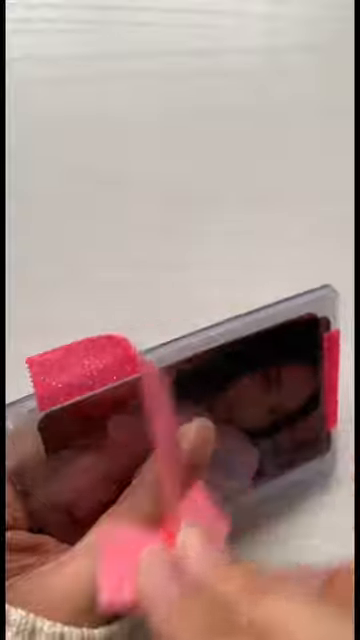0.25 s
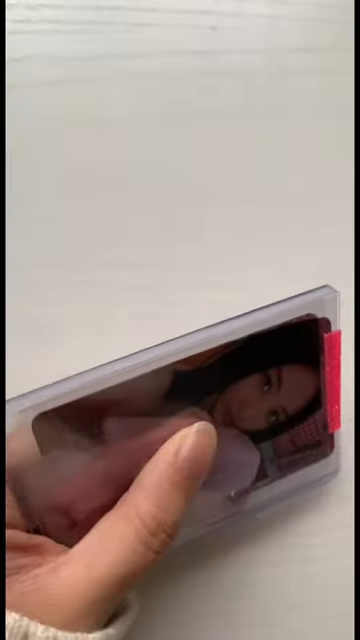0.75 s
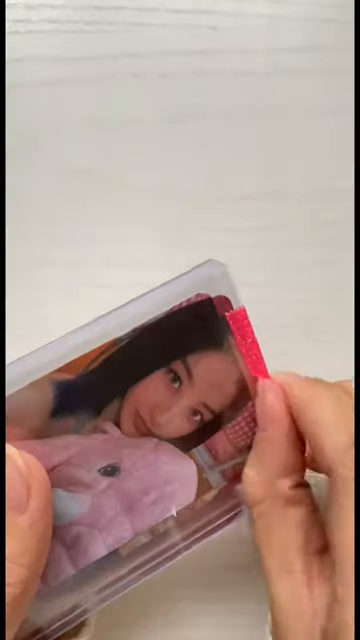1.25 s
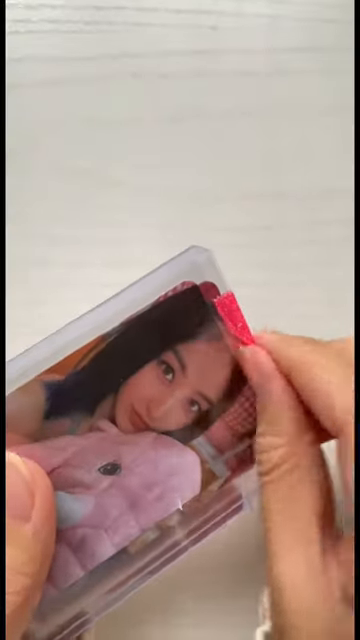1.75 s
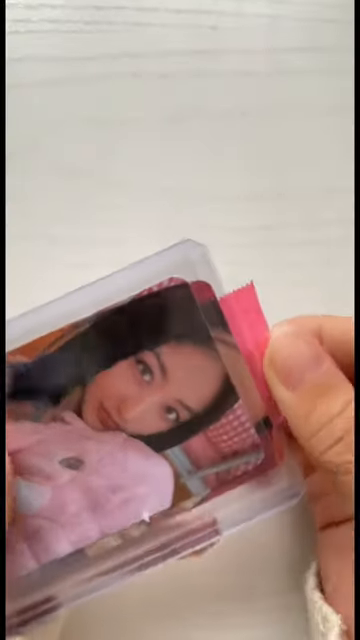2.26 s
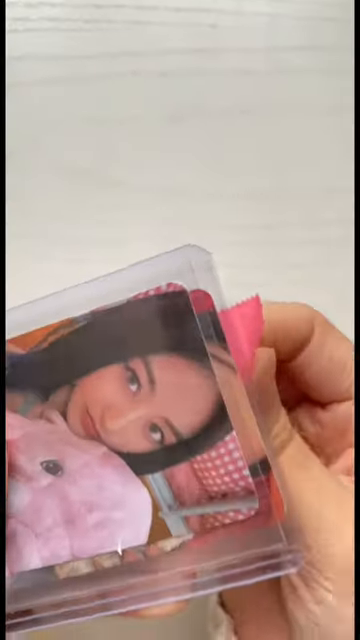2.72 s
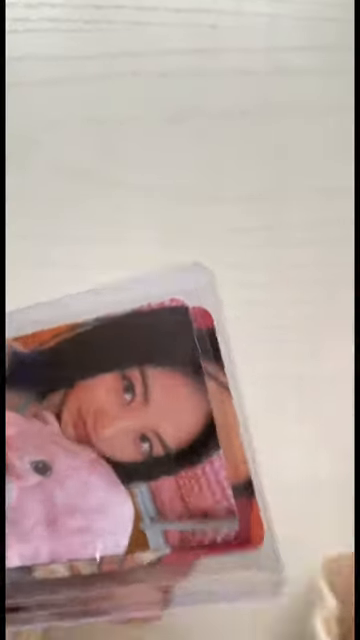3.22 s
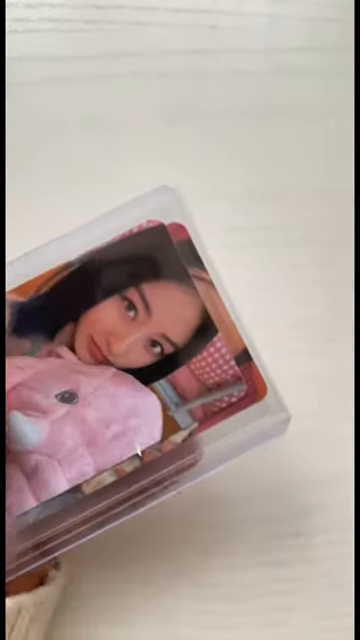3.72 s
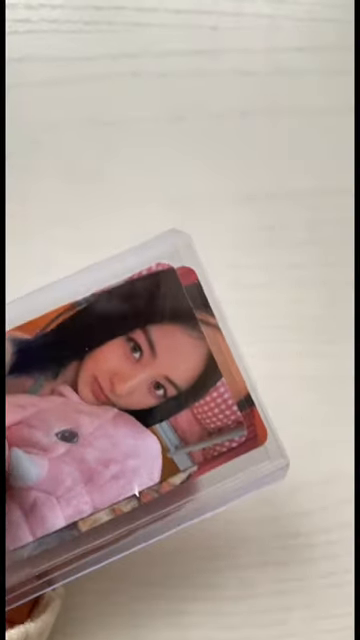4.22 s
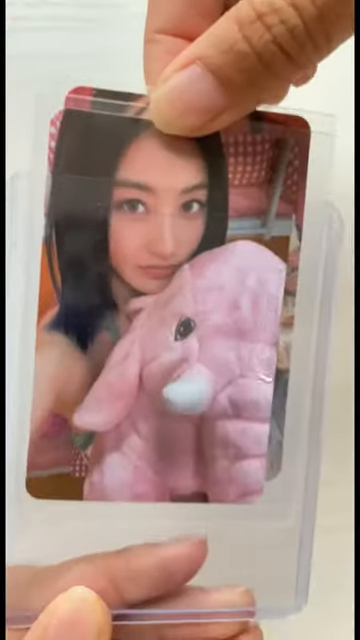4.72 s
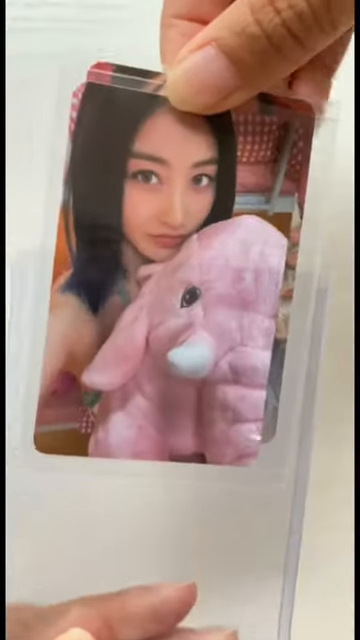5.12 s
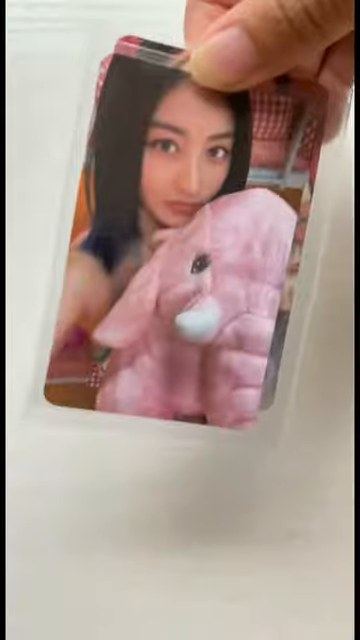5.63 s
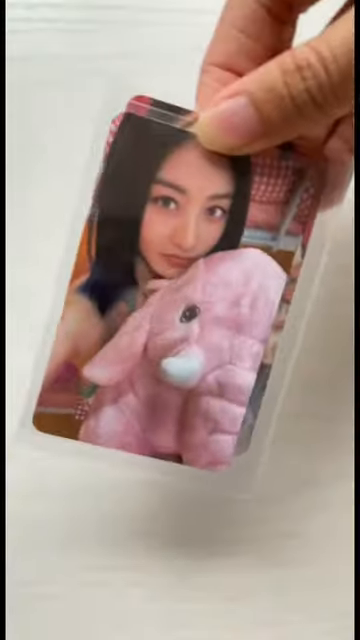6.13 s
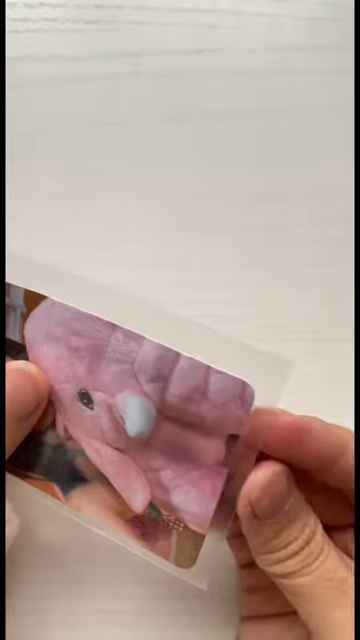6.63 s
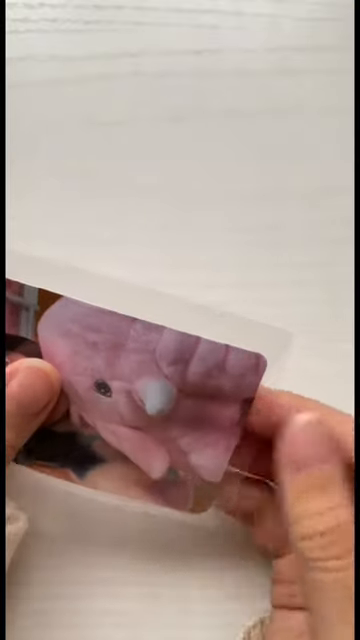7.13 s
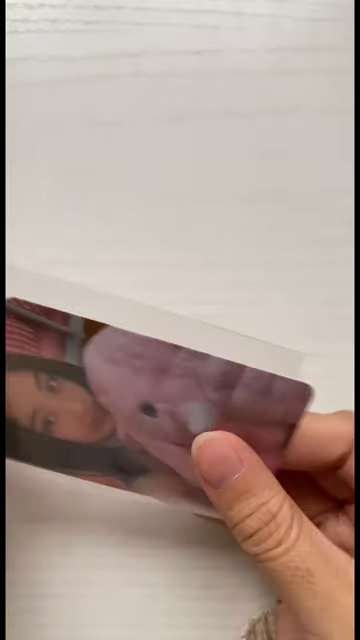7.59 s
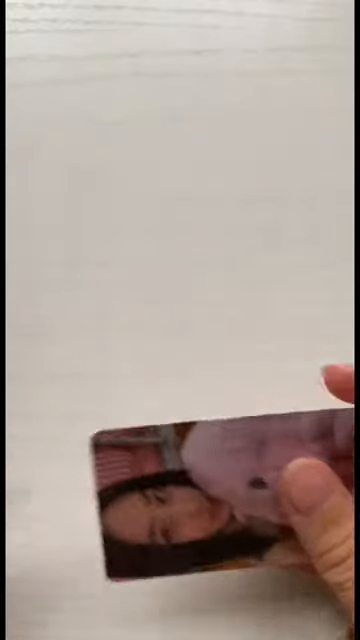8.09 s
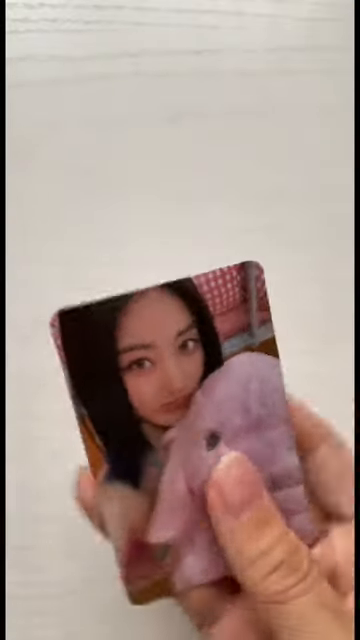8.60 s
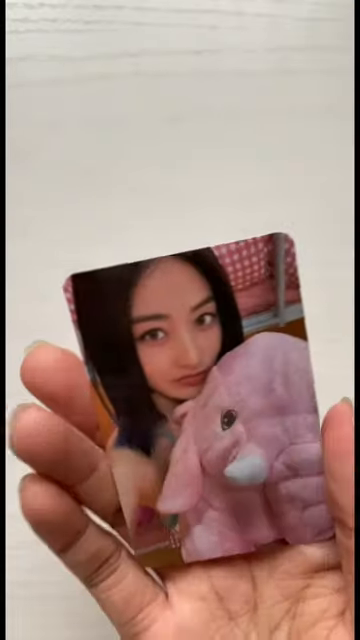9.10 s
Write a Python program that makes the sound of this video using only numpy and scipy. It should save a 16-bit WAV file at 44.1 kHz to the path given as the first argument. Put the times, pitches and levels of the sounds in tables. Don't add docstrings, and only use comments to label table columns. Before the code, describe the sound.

Close to the microphone on a desk in a quiet, humming room, tape rips off a rigid plastic holder in rapid sharp snaps. A fingernail picks at more tape with separate clicks, and a second short peel ends in a low thud. After faint rubbing, a thin sleeve is tugged out with a crinkle and pop; then film crackles and a card hisses out and is turned over with light ticks.

```python
import sys
import numpy as np
from scipy import signal
from scipy.fft import rfft, irfft, next_fast_len
from scipy.io import wavfile
from scipy.ndimage import uniform_filter1d, map_coordinates

SR = 44100
rng = np.random.default_rng(int(sys.argv[2]) if len(sys.argv) > 2 else 0)


def master(y):
    cut = np.clip(np.atleast_2d(y).T, -1, 1)
    pcm = np.round(cut * 32767)
    wavfile.write(sys.argv[1], SR, pcm.astype(np.int16))


def decibels_to_gain(level_db):
    exponent = np.asarray(level_db, float) / 20
    return 10 ** exponent


N = 412335

# time in seconds, level in dB.
HUM = [(0, -49), (.45, -56), (.9, -51), (1.85, -53), (1.95, -61), (2.4, -54), (2.9, -51.5), (3.1, -54.5),
       (3.8, -55.5), (4.2, -51), (4.9, -51.5), (5.2, -47.5), (5.6, -51.5), (5.95, -49), (6.2, -53),
       (8, -52.5), (8.8, -52.5), (9.35, -50.5)]
# frequency in Hz, density in dB per Hz.
ROOMTONE = [(13, -69), (22, -31.5), (46, -6), (96, 1), (149, -2.5), (174, -7), (203, -8), (252, -8.5),
            (441, -25), (610, -29), (900, -36), (1170, -78), (1980, -120)]
# frequency in Hz, width in Hz, level in dB.
DRONES = [(59.2, 22, -62.5), (120.1, 5.3, -62.5), (146.4, 2.35, -56.5), (215.5, 12.8, -69.5),
          (288.4, 20, -70)]
# frequency in Hz, density in dB per Hz.
HISS = [(290, -10.5), (500, -23.5), (605, -3), (641, -20.5), (859, -27), (1020, -14), (1090, -39.5),
        (8300, -26), (16500, -49.5)]
HISS_DB = -75.5
# frequency in Hz, 60 dB decay in seconds.
ROOM = [(300, 0.1), (2000, 0.15), (10000, 0.084)]
# frequency in Hz, lead of the left port in radians.
PORT_PHASE = [(0, 0), (500, .8), (1200, .6), (3300, 2.2), (4600, .6), (6500, -.6), (7700, -1.6),
              (8350, -np.pi), (10800, -2 * np.pi), (13450, -3 * np.pi), (15700, -4 * np.pi),
              (17000, -4.5 * np.pi)]
# frequency in Hz, left minus right in dB.
PORT_BALANCE = [(60, -5), (110, 1.5), (200, -12.5), (380, -10), (700, 15.5), (1290, 3), (2380, 0.5),
                (4400, 4.5), (8120, -5), (15000, 2)]
# frequency in Hz, shared part of the power from 0 to 1.
ALIKE = [(60, 0.82), (150, 0.97), (350, 0.063), (1000, 0.083), (3000, 0.97), (7000, 0.093), (8500, 0.36),
         (10000, 1), (16000, 0.64)]

# start in seconds, peak in dB, pitch in Hz, 60 dB decay in seconds,
# wooden rattle against the peak in dB.
THUDS = [(0.309, -39, 145, 0.17, -13), (1.888, -40, 99, 0.048, -4.5), (2.76, -35, 91, 0.14, -18.5),
         (2.808, -37, 109, 0.14, -19), (2.978, -21.5, 101, 0.094, -31), (3.264, -34.5, 61.4, 0.19, -17),
         (3.277, -37, 62.6, 0.041, -13.5), (3.32, -38, 58.6, 0.11, -18.5), (3.35, -37, 70, 0.17, -16.5),
         (3.401, -37.5, 60.2, 0.27, -24.5), (4.389, -25.5, 56.5, 0.081, -44),
         (5.341, -38.5, 110, 0.23, -17), (6.471, -37.5, 72, 0.072, -11), (6.788, -44, 124, 0.09, -16),
         (7.053, -34.5, 91, 0.089, -31), (8.879, -41.5, 48.7, 0.095, -18)]
# frequency in Hz, width in Hz, level in dB.
DESK = [(205, 66, -2), (296.6, 214, -2), (439, 290, -5.5)]

# frequency in Hz, level in dB.
FILM = [(4000, -22.5), (5500, -3), (7000, 4), (8500, 2), (9500, -2), (11000, -15)]
# frequency in Hz, level in dB.
EDGE = [(8000, -15), (9500, -5.5), (11000, 1.5), (13000, 4), (14500, 3.5), (15800, -4.5), (16600, -9)]
# frequency in Hz, level in dB.
CRINKLE = [(1600, -38.5), (2300, -1.5), (3200, 4.5), (4200, -0.5), (5100, -2.5), (6500, -42.5)]
# frequency in Hz, width in Hz, level in dB.
HOLDER = [(565, 480, -6.5), (1150, 246, -2.5), (1800, 335, -2.5)]

# peak time in seconds,
# peak in dB, seconds to gain 10 dB, seconds to lose 10 dB, pressure on the shell in dB.
LONG_TAPE = [(0, -59, .1, 0.3, 8), (.135, -47.5, 0.24, 0.1, -6), (.344, -48, 0.2, 0.7, 1.5)]
NAIL = [(.846, -59, 0.098, 0.046, -5), (.988, -52.5, 0.018, 0.027, 1), (1.06, -53.5, 0.045, 0.92, -20.5),
        (1.265, -49.5, 0.42, 0.038, -30), (1.399, -42.5, .008, 0.01, -0.5),
        (1.534, -47.5, 0.011, 0.017, -1.5), (1.699, -48.5, .11, 0.75, -27.5),
        (1.875, -50.5, 0.1, 0.058, -17), (2.185, -54, 0.17, 0.28, -12.5),]
SHORT_TAPE = [(2.499, -47.5, 0.11, .5, -9), (2.755, -44, 0.052, 0.11, 0), (2.88, -45.5, 0.013, 0.076, 2),
              (2.978, -51.5, 0.025, 0.035, 10), (3.02, -61, 0.037, .3, -8.5)]
HOLDER_RUBS = [(3.278, -66, 0.017, 0.062, 13), (3.427, -67.5, 0.25, 1.5, -34.5),
               (3.944, -67, 0.21, 0.56, -1), (5.365, -63.5, 0.013, 0.16, -2.5),
               (5.889, -72, .15, 4.1, -4.5)]
PULL_OUT = [(4.153, -59.5, .026, .3, 4), (4.25, -44.5, 0.028, 0.15, 4.2)]
DRAW_OUT = [(4.812, -60, .14, 0.53, -27), (5.096, -53, 0.25, .4, -6), (5.3, -50, 0.15, 0.036, -17),
            (5.342, -32.5, 0.017, .01, -7.5)]
SLEEVE = [(6.45, -44, 0.023, .12, 2.5), (6.62, -66.5, 0.07, 0.25, -7), (6.787, -48, 0.028, 0.032, -3),
          (6.745, -55, 0.014, 0.36, -5.5), (7.049, -43, .1, 0.04, -3.5), (7.2, -45, .35, 0.11, -6),
          (7.363, -53, 0.017, 0.31, -13), (7.58, -44.5, 0.13, .2, -14.5)]
SLIDE_OUT = [(7.7, -48.5, 0.18, 0.11, -2.5), (7.842, -44.5, .05, 0.049, -1.5)]
TURNING = [(7.95, -61.5, .05, 0.6, -1), (8.09, -61, 0.0157, 0.076, 10.5), (8.308, -55, .015, 0.02, 1.5),
           (8.426, -52, 0.014, 0.033, 0), (8.4, -57, .3, .25, -21), (8.575, -49.5, 0.053, 0.044, -13.5),
           (8.65, -52.5, .012, .075, 1.5), (8.86, -61, 0.058, .065, 9.5), (8.995, -54, 0.04, 0.0093, 5.5),
           (9.15, -66.5, .6, .6, 1.5), (9.309, -59.5, 0.033, 0.041, 3)]
# strokes, sharpness of the slips in dB, upper shell mode against lower in dB,
# crinkle in dB.
ACTIONS = [
    (LONG_TAPE, 0.95, 0.2, -4),
    (NAIL, -0.52, 2.9, -1.8),
    (SHORT_TAPE, 1.5, -3, -6),
    (HOLDER_RUBS, -3.7, 1.5, 1.2),
    (PULL_OUT, .3, .4, 4.5),
    (DRAW_OUT, -1.3, 5, 0.0086),
    (SLEEVE, -2, 2.8, -1.8),
    (SLIDE_OUT, 7.4, 7.9, 0.13),
    (TURNING, -1.9, 1.5, 3),
]
CRINKLE_FOLLOWS = 0.41
# time in seconds after which earlier strokes die fast,
# # time in seconds before which later strokes are held back (no gap where it comes first).
PAUSES = [(0.351, .745), (1.34, 1.385), (1.415, 1.3), (1.549, 1.4), (1.901, 1.7), (2.98, 3.3), (3.17, 3),
          (4.389, 4.57), (5.35, 5.355), (6.39, 6.41), (6.525, 5.8), (7.246, 7.34), (9.005, 7)]
LET_GO_S, GRIP_S = 0.011, 0.0075
RESTING_DB, RESTING_PRESS_DB = -84.5, 7.5
TICKS_PER_S, TICK_DB, TICK_T60_S = 130, 3.5, 0.0021

# start in seconds, peak in dB, holder ring against the peak in dB,
# ring pitch in Hz, top edge against the peak in dB.
GLUE_SNAPS = [(0.028, -26.5, -21.5, 1150, -10), (0.095, -22, -12.5, 1720, -10), (0.124, -19, -20, 820, -15),
              (0.144, -15.5, -16.5, 1070, -17), (0.178, -20.5, -8, 1800, -1.5), (0.206, -28, -6, 1530, -2),
              (0.318, -32, -16, 1140, -25), (0.344, -37, -5, 1230, -6), (2.46, -25.5, -23, 1180, -15),
              (2.496, -24, -23, 1150, -16), (2.508, -28, -20.5, 910, -19), (2.524, -21.5, -27, 920, -29),
              (2.563, -27.5, -21.5, 1040, -19), (2.758, -27.5, -10, 960, -23),
              (2.801, -22, -15.5, 1250, -16), (2.974, -17.5, -8, 1107, -20)]
NAIL_SNAPS = [(0.747, -32.5, -26, 2150, -17), (0.858, -44, -8.5, 1528, -24), (0.899, -43, -29, 807, -8),
              (0.986, -28, -19.5, 1197, -22), (1.391, -32, -16, 1150, -29), (1.472, -23, -39, 1800, -25),
              (1.534, -20.5, -22.5, 1190, -21), (1.652, -25.5, -37, 1780, -17),
              (1.761, -13, -41.5, 970, -27), (1.885, -18, -18.5, 1840, -7.5),
              (1.888, -11.5, -17.5, 1700, -9.5), (1.931, -17.5, -20.5, 1800, -23)]
HOLDER_SNAPS = [(3.27, -52, -11, 830, -29), (4.172, -41.5, -3, 2300, -26), (4.243, -31.5, -2, 2420, -16),
                (4.247, -27.5, -11.5, 1070, -9), (4.285, -26.5, -14, 1870, -13),
                (4.575, -47, -19, 1180, -20), (5.337, -25.5, -16, 897, -7), (5.538, -45.5, -21.5, 1770, -7)]
SLEEVE_SNAPS = [(6.412, -36, -5, 1350, -15), (6.636, -27.5, -18.5, 1250, -1), (6.785, -11, -22, 1230, -25),
                (6.938, -43, -14, 1090, -11), (7.049, -18, -15, 1150, -18), (7.202, -13, -28, 1530, -25),
                (8.087, -35.5, -11.5, 1260, -23), (8.173, -37.5, -8, 1230, -8.5),
                (8.427, -42.5, 0, 1330, -7), (8.645, -29, -18, 1530, -21), (9.089, -45, -17, 1350, -11.5),
                (9.3, -37, -21.5, 1250, -18)]
# snaps, crinkle against the peak in dB for a usual ring of the holder.
SNAPPERS = [
    (GLUE_SNAPS, -16),
    (NAIL_SNAPS, -14),
    (HOLDER_SNAPS, -16),
    (SLEEVE_SNAPS, -12.5),
]
CRINKLE_WITH_RING = 0.3


def unit(x):
    return x / np.sqrt(np.mean(x ** 2) + 1e-20)


def noise():
    return rng.standard_normal(N)


def along(points, hz):
    f, v = np.transpose(points)
    return np.interp(np.log(hz + 1), np.log(f + 1), v)


def wobble(rate):
    knots = rng.standard_normal(N // 16)
    return map_coordinates(knots, [np.arange(N) * rate / SR], order=1)


def filtered(x, response):
    m = next_fast_len(x.shape[-1] + 8192)
    spectrum = rfft(x, m) * response(np.fft.rfftfreq(m, 1 / SR))
    return irfft(spectrum, m)[..., :x.shape[-1]]


def colour(points):
    return lambda hz: decibels_to_gain(along(points, hz)) * (hz >= points[0][0]) * (hz <= points[-1][0])


def resonances(modes):
    def response(f):
        return sum((-1) ** k * decibels_to_gain(db) * 1j * f * width / (hz * hz - f * f + 1j * f * width)
                   for k, (hz, width, db) in enumerate(modes))
    return response


def room_tone():
    level_db = np.interp(np.arange(N) / SR, *np.transpose(HUM))
    rumble = unit(filtered(noise(), colour(ROOMTONE))) * decibels_to_gain(2.2 * wobble(5) - 54)
    for hz, width, db in DRONES:
        line = resonances([(hz, width, 0)])
        rumble += decibels_to_gain(db + 1.05 * wobble(2.61)) * unit(filtered(noise(), lambda f: line(f) ** 2))
    return decibels_to_gain(level_db + 2.5) * unit(rumble)


def air():
    return decibels_to_gain(HISS_DB) * unit(filtered(noise(), colour(HISS)))


def room(x):
    hz, t, z = signal.stft(rng.standard_normal((2, SR // 3)), SR, nperseg=256)
    decay = decibels_to_gain(-60 * t / along(ROOM, hz)[:, None])
    tail = signal.istft(z * decay, SR, nperseg=256)[1]
    late = np.pad(x, (150, 0))[None]
    return signal.fftconvolve(late, tail / np.linalg.norm(tail[0]), axes=1)[:, :N]


def ports(x):
    def half(f):
        lead = np.interp(f, *np.transpose(PORT_PHASE))
        return decibels_to_gain(along(PORT_BALANCE, f) / 2) * np.exp(.5j * lead)
    return filtered(x[None], lambda f: np.array([half(f), 1 / half(f)]))


def spread(source):
    share = lambda f: np.clip(along(ALIKE, f), 0, 1)
    shared = filtered(ports(source()), lambda f: np.sqrt(share(f)))
    own = np.array([source(), source()])
    return shared + filtered(own, lambda f: np.sqrt(1 - share(f)))


def thuds():
    out, t = np.zeros(N + SR), np.arange(SR // 3) / SR
    board = resonances(DESK)
    for s, db, hz, t60, rattle_db in THUDS:
        swell = decibels_to_gain(-60 * t / np.clip(t60, .02, .4)) * (1 - np.exp(-t * hz * 4.4)) ** 2
        push = -swell / swell.max() * np.sin(2 * np.pi * hz * t)
        burst = rng.standard_normal(len(t)) * decibels_to_gain(-60 * t / 0.066)
        rattle = filtered(burst, lambda f: board(f) ** 2)
        rattle *= decibels_to_gain(rattle_db + 10) / np.abs(rattle).max()
        out[round(s * SR):][:len(t)] += decibels_to_gain(db) * (push + rattle)
    return out[:N]


def strokes():
    t = np.arange(0, N / SR + .002, .002)
    power = np.zeros((5, len(t)))
    power += decibels_to_gain(2 * (RESTING_DB + RESTING_PRESS_DB * np.c_[[0, 0, 1, 1, 1]]))
    off, on = np.transpose([(-1, -1), *PAUSES, (99, 99)])
    for rows, edge_db, upper_db, crinkle_db in ACTIONS:
        for s, db, rise, fall, press_db in rows:
            level_db = db - 10 * np.maximum((s - t) / abs(rise), (t - s) / abs(fall))
            since_let_go = (t - off[off >= s][0]).clip(0)
            until_grip = (on[on <= s][-1] - t).clip(0)
            level_db -= 10 * (since_let_go / LET_GO_S + until_grip / GRIP_S)
            mix_db = [0, edge_db, press_db - upper_db / 2, press_db + upper_db / 2,
                      crinkle_db + CRINKLE_FOLLOWS * press_db]
            power += decibels_to_gain(2 * (level_db + np.c_[mix_db]))
    return np.array([np.interp(np.arange(N) / SR, t, np.sqrt(p)) for p in power])


def slip_clumps(pull):
    effort = np.clip((20 * np.log10(pull + 1e-9) + 75) / 30, 0, 1)
    bunching = 1.13 * wobble(35) + 0.76 * wobble(250) + 0.59 * wobble(1500)
    slips = decibels_to_gain((1 + 0.98 * effort) * bunching)
    grit = (rng.random(N) < TICKS_PER_S / SR) * decibels_to_gain(TICK_DB * rng.exponential(size=N).clip(0, 3))
    tick = decibels_to_gain(-60 * np.arange(512) / SR / TICK_T60_S)
    slips *= 1 + effort * np.abs(signal.fftconvolve(grit, tick)[:N])
    return slips / np.sqrt(np.abs(uniform_filter1d(slips ** 2, size=3000)))


def patchy(depth_db):
    z = signal.stft(noise(), nperseg=256)[2]

    def smooth(bins, frames):
        over_hz = uniform_filter1d(rng.standard_normal(z.shape), bins, axis=0)
        return unit(uniform_filter1d(over_hz, frames, axis=1))

    field = smooth(6, 14) + .8 * smooth(2, 60)
    return signal.istft(z * decibels_to_gain(depth_db * field), nperseg=256)[1][:N]


def rubbing(slips, gains):
    source = slips * patchy(depth_db=3.5)
    shell = resonances(HOLDER[:-1])
    lower = lambda f: shell(f) * f / (f + 500)
    upper = resonances(HOLDER[-1:])
    paths = [(colour(FILM), -3.2), (colour(EDGE), -3.2), (lower, -4), (upper, -6.5), (colour(CRINKLE), -3.3)]
    return sum(decibels_to_gain(db) * gain * unit(filtered(source, path)) for (path, db), gain in zip(paths, gains))


def snaps():
    out, t = np.zeros(N + SR), np.arange(2048) / SR
    fade = lambda t60: decibels_to_gain(-60 * t / t60) * (1 - np.exp(-t / 0.00091))
    rows = [(*row, crinkle_db) for table, crinkle_db in SNAPPERS for row in table]
    for s, db, ring_db, hz, edge_db, crinkle_db in rows:
        splinters = rng.standard_normal(len(t)) ** 3
        splinters[24] = 30
        shell = resonances([(hz, 0.15 * hz, 0), (1.677 * hz, 0.046 * hz, -6), (.5 * hz, 0.99 * hz, -15)])
        slow = 1 + np.clip((-30 - db) / 7, 0, 1.5)
        crinkle_db += CRINKLE_WITH_RING * (ring_db + 14.5)
        layers = [(colour(FILM), slow * 0.013, -5.5),  # path, t60 s, dB
                  (colour(EDGE), 0.011, edge_db + 11.5),
                  (colour(CRINKLE), slow * 0.018, crinkle_db + 2.5),
                  (shell, slow * 0.005, ring_db + 12)]
        for path, t60, rel_db in layers:
            x = filtered(splinters * fade(t60), path)
            out[round(s * SR):][:len(t)] += decibels_to_gain(db + rel_db) * x / np.abs(x).max()
    return out[:N]


def thin_treble(x, from_hz, gap_db, quiet_db, crest_db):
    hz, _, z = signal.stft([x[0] + x[1], x[0] - x[1]], SR, nperseg=2048)
    bands = np.abs(z[:, :1024] ** 2).reshape(2, 32, 32, -1).mean(axis=2)
    centre = hz[16:1024:32, None]
    weak = (bands < bands[::-1] * decibels_to_gain(-2 * gap_db - 9 * (centre < from_hz))) & (centre > 2500)
    quiet = ((bands < decibels_to_gain(2 * quiet_db)) & (centre > 1.5 * from_hz)) | (centre > 16000)
    power = uniform_filter1d(np.diff(x[0], prepend=0) ** 2, size=128)
    length = z.shape[-1] * 1024
    frames = np.pad(power, (512, length))[:length].reshape(-1, 1024)
    click = frames.max(axis=1) > frames.mean(axis=1) * decibels_to_gain(2 * crest_db)
    z[:, :1024] *= np.repeat(~(weak | quiet) | click, 32, axis=1)
    mid, side = signal.istft(z, SR, nperseg=2048)[1][:, :N] / 2
    return np.array([mid + side, mid - side])


def scene():
    gains = strokes()
    cracks, slips = snaps(), slip_clumps(gains[0])
    rubs = spread(lambda: rubbing(slips, gains))
    direct = ports(cracks + thuds())
    reflected = decibels_to_gain(-15) * room(cracks + decibels_to_gain(-1.5) * rubs[0])
    return direct + reflected + rubs + spread(room_tone) + spread(air)


def roll_off(x):
    return signal.sosfilt(signal.butter(12, 17000, fs=SR, output="sos"), x)


def record(dry):
    thinned = thin_treble(dry, from_hz=8200, gap_db=4.5, quiet_db=-102, crest_db=8)
    return roll_off(thinned)


dry = scene()
out = record(dry)
master(out)
```